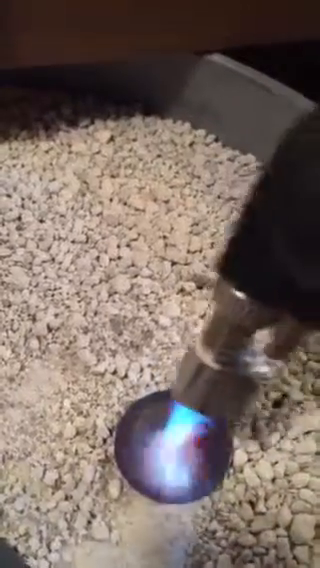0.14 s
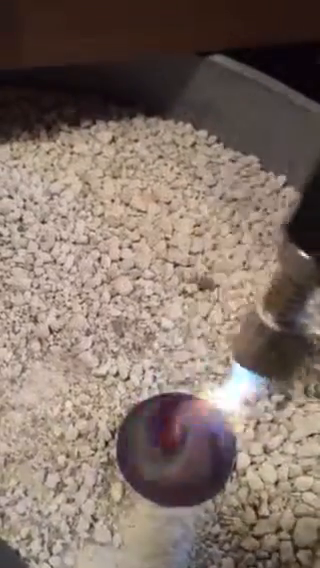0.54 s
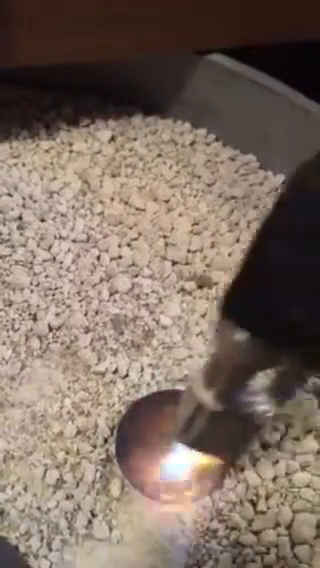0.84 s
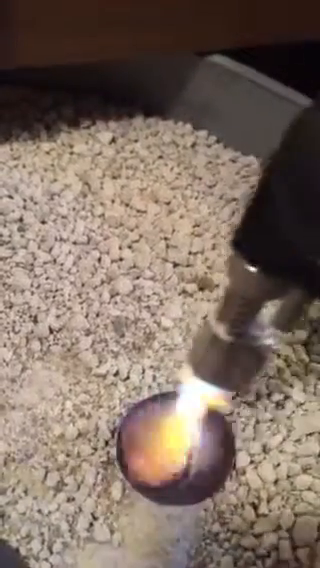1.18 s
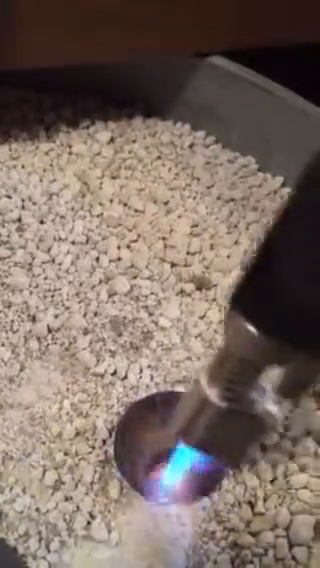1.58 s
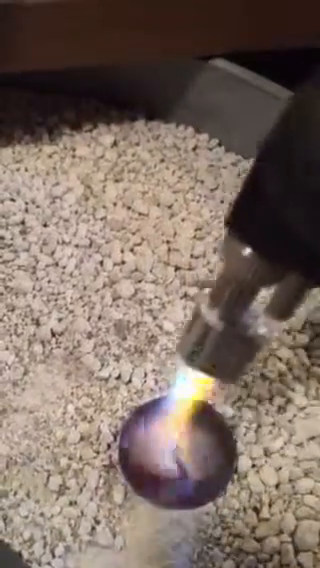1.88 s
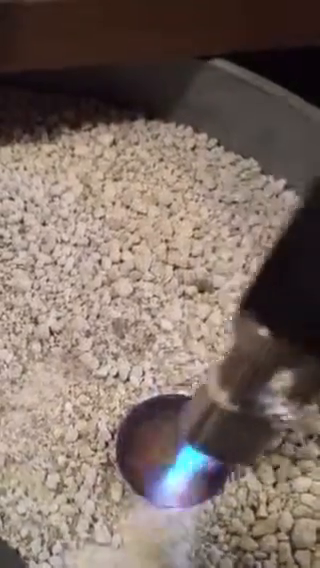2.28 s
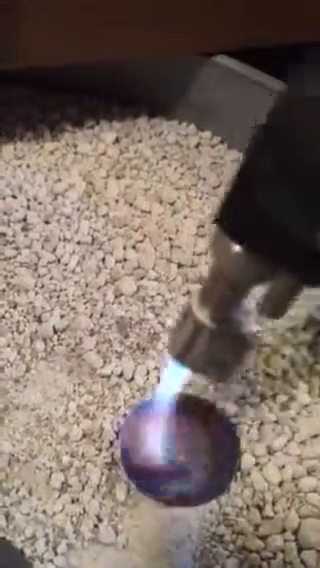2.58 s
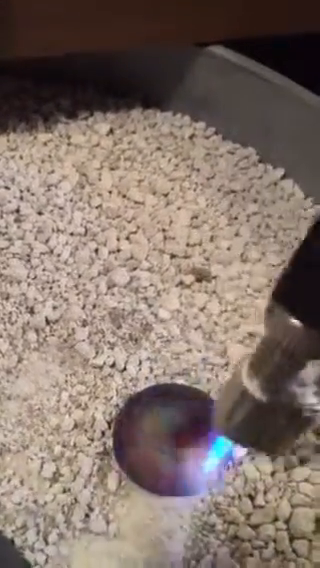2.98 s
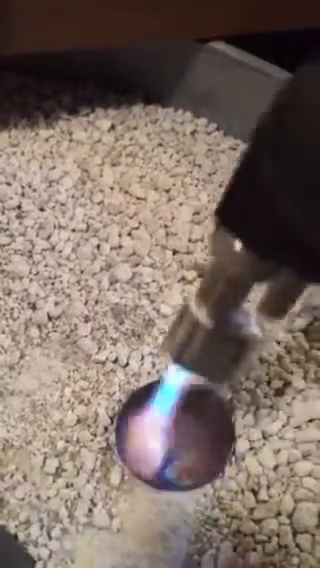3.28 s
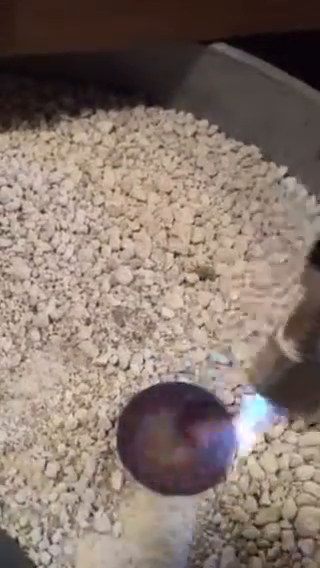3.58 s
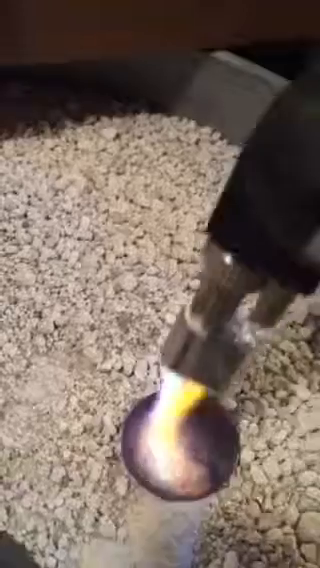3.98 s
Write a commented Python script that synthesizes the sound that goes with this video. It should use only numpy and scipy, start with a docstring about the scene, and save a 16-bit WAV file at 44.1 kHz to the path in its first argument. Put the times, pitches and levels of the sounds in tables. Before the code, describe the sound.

Close, bright gas-jet hiss sweeps gently up and down over a low flame murmur, broken by ragged bursts of fluttering flame.

```python
"""A gas torch hisses close by, its tone sliding as it circles over a metal disc on a tray of gravel.
The hiss is noise shaped by burner resonances and combed by echoes off the disc and the gravel.
Under it the flame murmurs: resonated noise in a broad rush. Where deflected, it tears into a crackling
flutter of random pops, with soft thumps (short bass pulses). Sparse workshop reflections follow."""
import sys
import numpy as np
from scipy import signal
from scipy.fft import rfft, irfft
from scipy.io import wavfile

SR = 44100
rng = np.random.default_rng(int(sys.argv[2]) if len(sys.argv) > 2 else 0)


def dump_mix(stems):
    """Bounce the given channels to the path in sys.argv[1] as a 16-bit WAV at rate SR."""
    frames = np.atleast_2d(stems).T  # one column per channel
    limited = np.clip(frames, -1, 1)  # hard clip at full scale
    pcm = np.round(limited * 32767).astype(np.int16)
    wavfile.write(sys.argv[1], SR, pcm)


N = 182618
TIME = np.arange(N) / SR

# Gas jet. Each row: time in seconds, level in dB before trim and flicker.
JET_LEVEL = [(0.02, -49), (0.12, -44), (0.14, -47), (1.01, -48), (1.12, -46), (1.21, -49), (1.36, -46),
             (1.44, -49), (1.77, -44), (2.09, -48), (2.38, -45), (2.86, -46), (3.01, -48), (3.36, -45),
             (3.5, -47), (4.09, -46), (4.1, -44)]
# Burner resonances. Each row: centre in Hz before drift, half-power width in Hz, level in dB before sway,
# share (0-1) of the upper resonance's drift.
BURNER_RESONANCES = [(4978, 774, 7, 0.14), (5680, 1220, 0.5, 1), (7250, 790, -2.5, 0), (8550, 780, 9, 0.94),
                     (9470, 1190, 2, 0), (11170, 960, -0.5, 0.2), (12400, 540, 5.5, 0.8),
                     (14750, 1440, 1.5, 0.1)]
# Broad hiss under them, hollow between some. Each row: frequency in Hz, relative density in dB per Hz.
JET_COLOUR = [(300, -39), (1500, -11), (2800, -9.5), (3900, -14), (5900, -3), (6300, -25), (6700, -10.5),
              (10000, -23.5), (12900, -12), (13550, -45), (14300, -32)]
# Turns of the hand, each starting high over the disc. Each row: start in seconds, frequency in Hz that
# the disc's echo cancels when the torch is nearest.
HAND_TURNS = [(-0.6, 5430), (0.12, 5580), (0.85, 5500), (1.55, 5270), (2.27, 5330), (3.06, 5450),
              (3.74, 5250)]
# Disc echo against the direct hiss. Each row: frequency in Hz, strength in dB.
DISC_ECHO = [(3000, -28), (4500, -7), (5500, 0), (7000, -15), (12000, -15)]
# Faint flutter between flares. Each row: time in seconds, strength in dB.
SIMMER = [(0.0, -50.5), (0.5, -53), (1.28, -67), (2.05, -58), (2.5, -54.5), (2.77, -60), (3.1, -53),
          (3.75, -53), (4.14, -56.5)]
# Flares, where the deflected flame tears. Each row: start in seconds, length in seconds before release,
# mid-length strength in dB, swell from start to end in dB, sharpness (treble against body) in dB.
FLARES = [(0.109, 0.16, -41.5, -0.5, 0.5), (0.171, 0.053, -34, -4.5, -2), (0.286, 0.13, -40, -0.5, -6),
          (0.599, 0.39, -44, 4, 6), (0.697, 0.02, -38.5, 1, 0), (0.899, 0.19, -38, 3.5, 4.5),
          (1.118, 0.098, -40.5, 4.5, 3.5), (1.228, 0.11, -59, -3, 28), (1.313, 0.14, -36.5, -0.5, 4),
          (1.47, 0.16, -41, 7.5, 2.5), (1.627, 0.081, -41.5, -7, -4), (2.136, 0.18, -41, 6.5, 3.5),
          (2.333, 0.078, -39.5, -4, -7.5), (2.6, 0.12, -46.5, -2, -6), (2.652, 0.033, -35, -4, -15),
          (2.793, 0.22, -39.5, 7.5, 1.5), (3.36, 0.04, -36, 2.5, -8), (3.439, 0.016, -35, 4, -14),
          (3.6, 0.34, -61, -8, 15)]
# Broad rush around the murmur. Each row: frequency in Hz, relative density in dB per Hz.
RUSH_COLOUR = [(25, -59), (80, -16.5), (165, 5), (300, -3.5), (430, -1.5), (590, -9.5), (800, -15),
               (1000, -49), (1700, -34), (2700, -52), (4000, -41), (8000, -53)]
# Flutter before sharpening. Each row: frequency in Hz, relative density in dB per Hz.
FLUTTER_COLOUR = [(30, -56), (80, -16), (160, -3), (350, 1), (490, -1.5), (590, 2.5), (780, -9.5),
                  (960, -4), (1300, -9), (1560, -12.5), (1760, -23), (2130, -19), (2330, -24.5),
                  (2700, -17.5), (3050, -27.5), (3400, -26), (6000, -60)]
# Thumps of the flame catching up with the jet. Each row: time in seconds, ahead of the puff's centre
# by a fixed delay; envelope peak in dB.
THUMPS = [(0.189, -56), (0.434, -55), (1.104, -46), (1.234, -54), (1.659, -55), (1.729, -59), (2.429, -53),
          (2.714, -53), (3.029, -53), (3.419, -51), (3.479, -55)]

CIRCLE_S = 0.725  # period of the resonance drift and of the gravel echoes' swing
CLOSING_SHARE = 0.73  # the torch sinks for this share of a turn, then lifts quickly
CANCELLED_LOW_HZ = 4870  # cancelled by the disc's echo with the torch farthest away
DISC_DELAY_CYCLES = 4.5  # half-odd lag, so the echo opposes the direct hiss
GRAVEL_SCATTER = 0.38  # rms sum of the gravel echoes, direct hiss = 1
DRIFT_HZ, DRIFT_TOP_AT_S, DRIFT_HZ_PER_S = 140, 0.22, 60  # swing, its crest, steady creep upward
ATTACK_S, RELEASE_DB_PER_S = 0.018, 448
SIMMER_SHARPNESS_DB = -2
MURMUR_HZ, MURMUR_HZ_PER_DB = 246, 4  # centre at the mean simmer; rise as the flame tears
LULL_DB, LULL_AFTER_S, LULL_S = -3.5, 0.034, 0.027  # depth, lag behind the thump's row, width
EDGE_HZ = 15400


def gain_of(db):
    """Decibels to amplitude."""
    return 10 ** (np.asarray(db) / 20)


def evened(x):
    """Scale to rms 1."""
    return x / np.sqrt(np.mean(x ** 2) + 1e-20)


def read(points, hz):
    """Read a spectrum in dB on a log-frequency axis."""
    point_hz, db = np.transpose(points)
    return np.interp(np.log(hz + 1), np.log(point_hz), db)


def follow(rows, t):
    """Read every column of a curve at the times t."""
    s, *columns = np.transpose(rows)
    return [np.interp(t, s, column) for column in columns]


def wander(rate_hz):
    """Smooth random curve of rms 1: noise under a Gaussian low-pass."""
    hz = np.fft.rfftfreq(N, 1 / SR)
    spectrum = rfft(rng.standard_normal(N)) * np.exp(-(hz / rate_hz) ** 2)
    return evened(irfft(spectrum, N))


def coloured(x, colour, size=4096):
    """Minimum-phase filter of the given spectrum: each pop starts sharply and rings out."""
    hz = abs(np.fft.fftfreq(size, 1 / SR))
    log_gain = np.log(gain_of(read(colour, hz)))
    ring = np.fft.ifft(np.exp(np.conj(signal.hilbert(log_gain)))).real
    return evened(signal.oaconvolve(x, ring[:size // 2])[:N])


def swept(x, gain, size=512):
    """Time-varying filter: gain(Hz, s)."""
    overlap = size * 3 // 4
    hz, t, z = signal.stft(x, SR, nperseg=size, noverlap=overlap)
    return signal.istft(z * gain(hz[:, None], t), SR, nperseg=size, noverlap=overlap)[1][:N]


def resonate(x, hz, width_hz):
    """One-pole resonance whose centre follows the curve hz."""
    turn = np.exp(2j * np.pi * np.cumsum(hz) / SR)
    pole = np.exp(-np.pi * width_hz / SR)
    return 2 * (turn * signal.lfilter([1 - pole], [1, -pole], x / turn)).real


def burner(hz, t, sway_db=1.1, stray=0.0059):
    """Jet spectrum: broad hiss plus burner resonances, each swaying in level on its own."""
    swing_hz = DRIFT_HZ * np.cos(2 * np.pi * (t - DRIFT_TOP_AT_S) / CIRCLE_S)
    drift_hz = swing_hz + DRIFT_HZ_PER_S * (t - t.mean())
    hz = hz * (1 + stray * np.interp(t, TIME, wander(rate_hz=3.6)))
    power = gain_of(read(JET_COLOUR, hz)) ** 2
    for centre_hz, width_hz, db, share in BURNER_RESONANCES:
        swayed_db = db + sway_db * np.interp(t, TIME, wander(rate_hz=5))
        offset = 2 * (hz - centre_hz - share * drift_hz) / width_hz
        power = power + gain_of(swayed_db) ** 2 * 0.5 ** (offset ** 2)
    return np.sqrt(power)


def cancelled_hz(t):
    """Frequency the disc's echo cancels: climbs as the torch sinks, falls as the hand lifts."""
    starts_s, tops_hz = np.transpose(HAND_TURNS)
    bounds_s = np.append(starts_s, starts_s[-1] + CIRCLE_S)
    turns = np.interp(t, bounds_s, np.arange(len(HAND_TURNS) + 1))
    nearness = np.interp(turns % 1, [0, CLOSING_SHARE, 1], [0, 1, 0])
    top_hz = tops_hz[np.searchsorted(starts_s, t) - 1]
    return CANCELLED_LOW_HZ + nearness * (top_hz - CANCELLED_LOW_HZ)


def tray(hz, t, nearest_s=0.000357, farthest_s=0.002, swing_s=0.0001, count=8):
    """Delayed echoes off disc and gravel comb the hiss; the combs slide as the hand circles."""
    disc_s = DISC_DELAY_CYCLES / cancelled_hz(t)
    paths = 1 + gain_of(read(DISC_ECHO, hz)) * np.exp(-2j * np.pi * hz * disc_s)
    for place, angle, creep in rng.random((count, 3)):
        circling = np.cos(2 * np.pi * (t / CIRCLE_S + angle)) + (creep - 0.5) * t
        stone_s = nearest_s + place * (farthest_s - nearest_s) + swing_s * circling
        paths = paths + GRAVEL_SCATTER / np.sqrt(count) * np.exp(-2j * np.pi * hz * stone_s)
    return abs(paths)


def jet(trim_db=-0.02, flicker_db=0.87):
    """Gas rushes from the nozzle, slightly unsteady: noise through burner and tray."""
    noise = rng.standard_normal(N)
    hiss = evened(swept(noise, lambda hz, t: burner(hz, t) * tray(hz, t), size=1024))
    return hiss * gain_of(follow(JET_LEVEL, TIME)[0] + trim_db + flicker_db * wander(rate_hz=25))


def burning(pops_per_s, spread_db, smooth_share):
    """Gas pockets ignite at random, in many sizes, over an even turbulence."""
    size = gain_of(spread_db * np.clip(rng.standard_normal(N), -2, 2))
    pops = size * (rng.random(N) < pops_per_s / SR)
    rough = np.sqrt(1 - smooth_share) * evened(pops - pops.mean())
    return rough + np.sqrt(smooth_share) * rng.standard_normal(N)


def tearing(t):
    """Flutter strength and sharpness in dB: each flare catches, swells or sinks, dies into the simmer."""
    power = gain_of(follow(SIMMER, t)[0]) ** 2
    weighted_sharpness = power * SIMMER_SHARPNESS_DB
    for start_s, length_s, db, swell_db, sharp_db in FLARES:
        age_s = t - start_s
        attack = np.clip(age_s / ATTACK_S, 0, 1)
        hold_db = db + swell_db * (np.clip(age_s / length_s, 0, 1) - 0.5)
        release_db = RELEASE_DB_PER_S * np.maximum(age_s - length_s, 0)
        flare_power = (attack * gain_of(hold_db - release_db)) ** 2
        power = power + flare_power
        weighted_sharpness = weighted_sharpness + flare_power * sharp_db
    return 10 * np.log10(power), weighted_sharpness / power


def flame(murmur_db=-48.3, rush_db=-51.5, murmur_width_hz=120, waver=0.14, flicker_db=1.24):
    """Eddies shed at a loosely held rate: wavering murmur in a broad rush, sinking after each thump."""
    torn_db = tearing(TIME)[0] - np.mean(SIMMER, axis=0)[1]
    hz = (MURMUR_HZ + MURMUR_HZ_PER_DB * torn_db) * (1 + waver * wander(rate_hz=11))
    once = resonate(rng.standard_normal(N), hz, murmur_width_hz)
    murmur = evened(resonate(once, hz, murmur_width_hz))
    rush = coloured(burning(pops_per_s=930, spread_db=2.5, smooth_share=0.96), RUSH_COLOUR)
    lull_db = sum(LULL_DB * np.exp(-((TIME - s - LULL_AFTER_S) / LULL_S) ** 2) for s, _ in THUMPS)
    unsteady = gain_of(lull_db + flicker_db * wander(rate_hz=8.3))
    return (gain_of(murmur_db) * murmur + gain_of(rush_db) * rush) * unsteady


def above(hz, edge_hz):
    """Smooth step from 0 below the edge to 1 above it."""
    return hz ** 4 / (hz ** 4 + edge_hz ** 4)


def flutter(knee_hz=1080, bass_hz=140, thinning=0.28, flicker_db=1.15, shiver_db=0.95):
    """The deflected flame burns in rough pops; sharper means more treble and less bass."""
    def sharpening(hz, t):
        """Gain tilted by the current sharpness."""
        tilt = above(hz, knee_hz) - thinning * (1 - above(hz, bass_hz))
        return gain_of(tearing(t)[1] * tilt)

    pops = coloured(burning(pops_per_s=1600, spread_db=8.5, smooth_share=0.63), FLUTTER_COLOUR)
    pops = swept(pops, sharpening)
    unsteady_db = flicker_db * wander(rate_hz=40) + shiver_db * wander(rate_hz=150)
    return pops * evened(gain_of(unsteady_db)) * gain_of(tearing(TIME)[0])


def thumps(pitch_hz=66, pitch_spread=0.032, width_s=0.0092, delay_s=0.0142):
    """Each flap of the whole flame pushes out a slow puff of air: a sine under a Gaussian."""
    out = np.zeros(N)
    for (s, db), chance in zip(THUMPS, rng.standard_normal(len(THUMPS))):
        t = TIME - s - delay_s
        swing = np.sin(2 * np.pi * pitch_hz * (1 + pitch_spread * chance) * t)
        out += gain_of(db) * np.exp(-(t / width_s) ** 2 / 2) * swing
    return out


def workshop(x, wet_db=-15, t60_s=0.04, first_s=0.0026, taps_per_s=1500):
    """Sparse reflections from bench and walls die quickly."""
    t = TIME[:SR // 2]
    sparse = rng.standard_normal(len(t)) * (rng.random(len(t)) < taps_per_s / SR)
    taps = sparse * (t > first_s) * gain_of(-60 * t / t60_s)
    return x + gain_of(wet_db) * signal.oaconvolve(x, taps / np.linalg.norm(taps))[:N]


def scene():
    """Jet, flame, flutter and thumps in the room, one channel."""
    return workshop(jet() + flame() + flutter() + thumps())[None]


def record(dry, low_cut_hz=44):
    """A small microphone loses the deepest bass; a linear-phase low-pass limits the treble."""
    high_pass = signal.butter(4, low_cut_hz, "highpass", fs=SR, output="sos")
    thin = signal.sosfilt(high_pass, dry)
    low_pass = signal.firwin(1023, EDGE_HZ, window=("kaiser", 9), fs=SR)
    return signal.oaconvolve(thin, low_pass[None], "same")


dry = scene()
out = record(dry)
dump_mix(out)
```